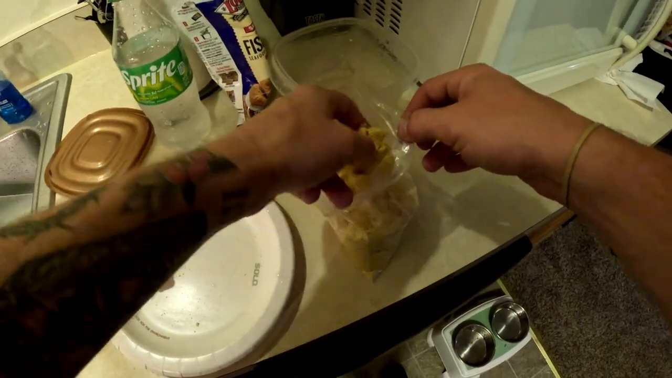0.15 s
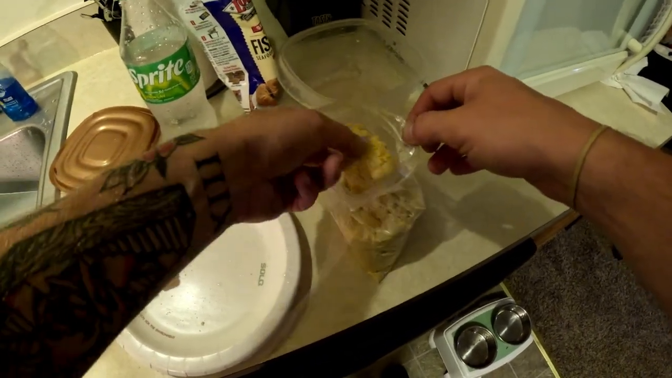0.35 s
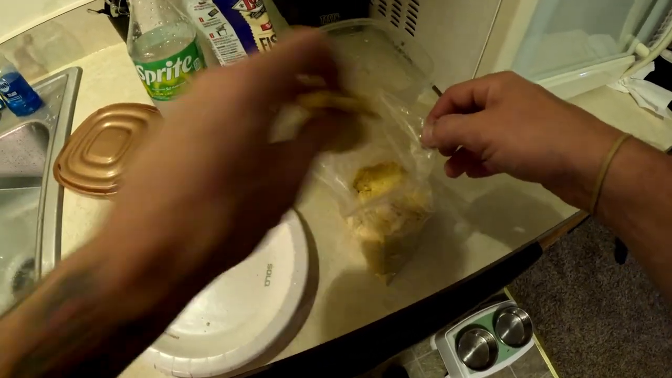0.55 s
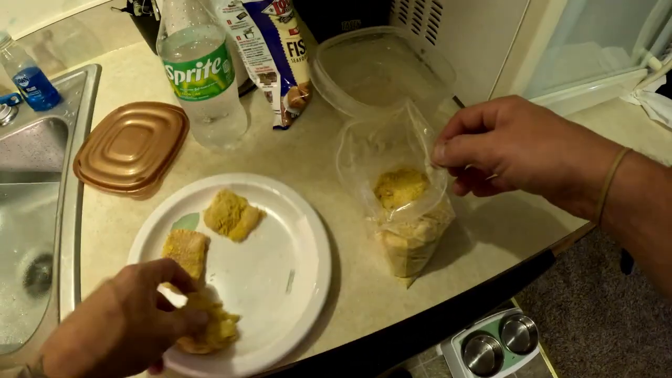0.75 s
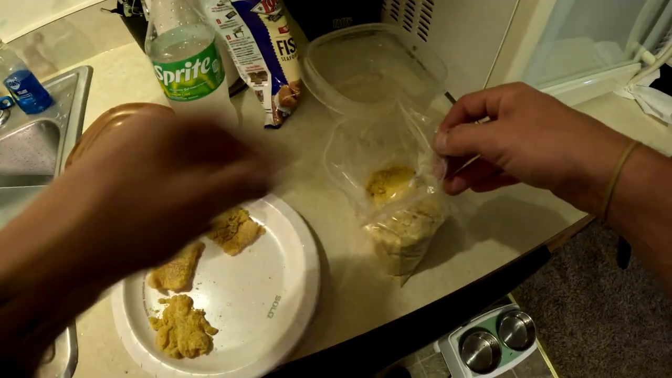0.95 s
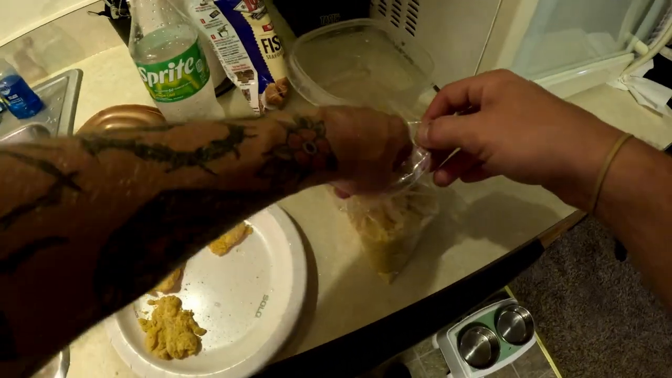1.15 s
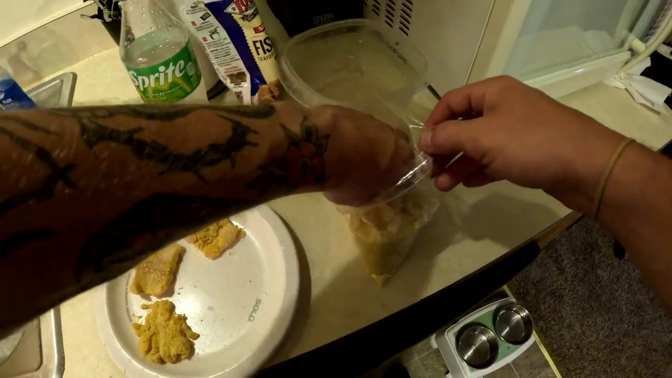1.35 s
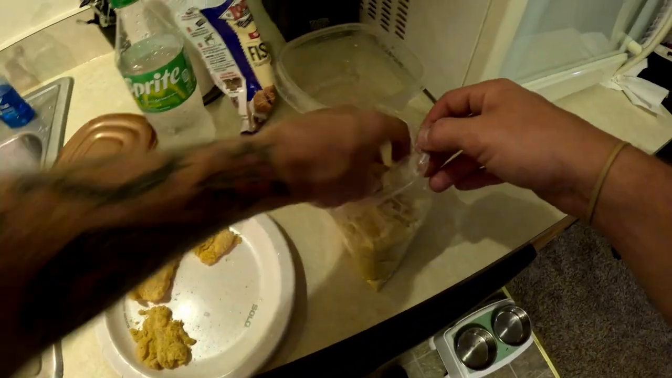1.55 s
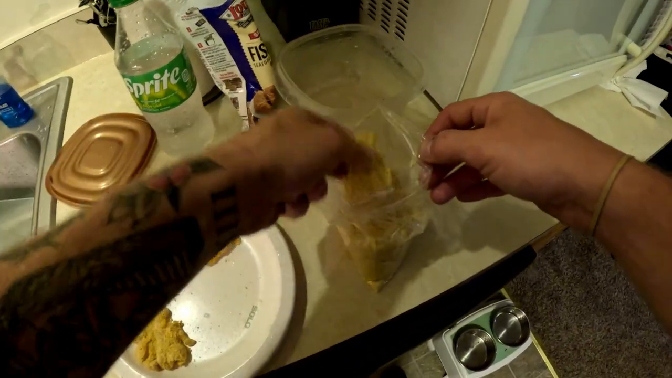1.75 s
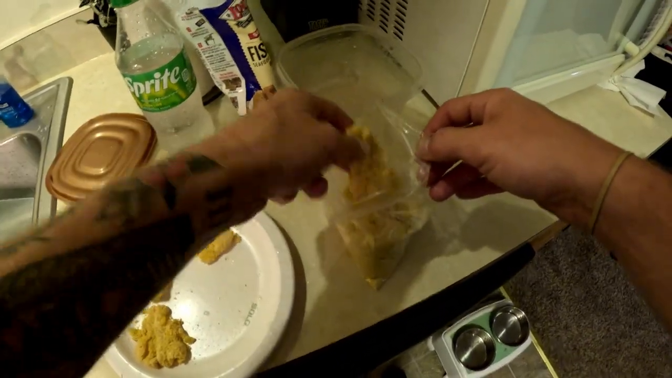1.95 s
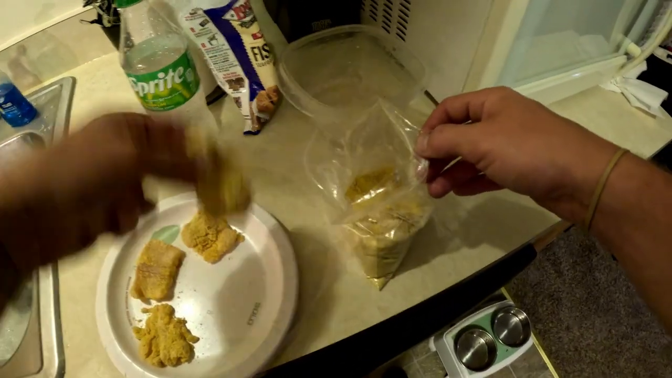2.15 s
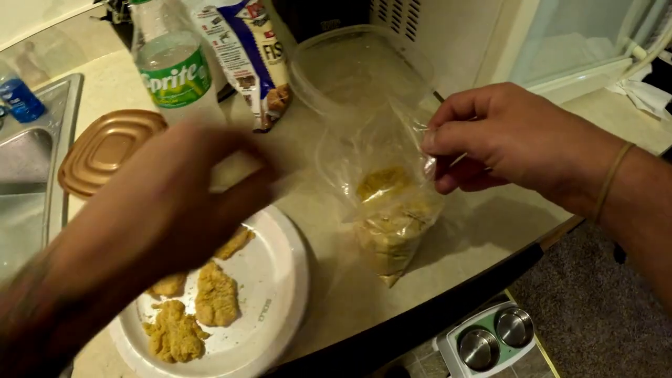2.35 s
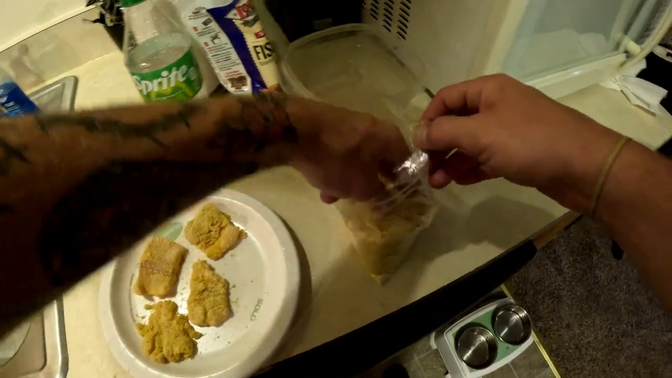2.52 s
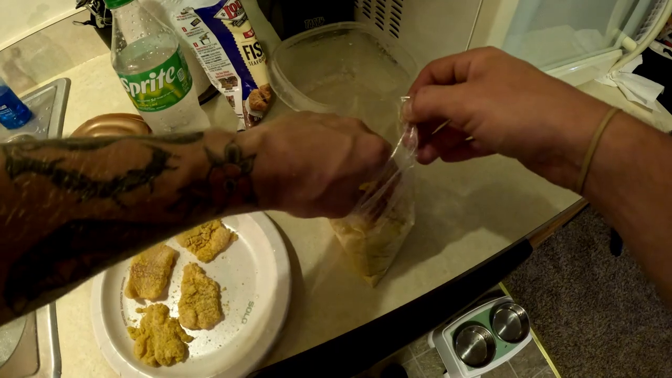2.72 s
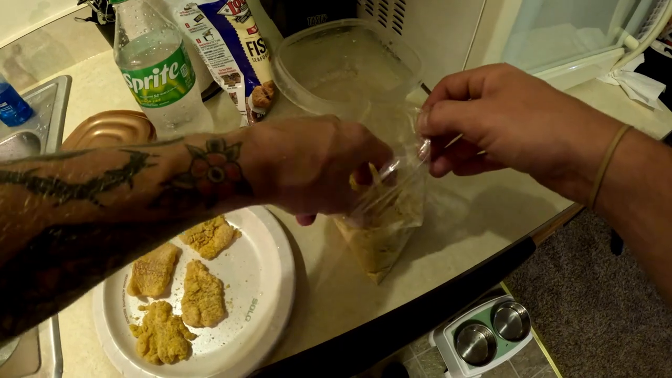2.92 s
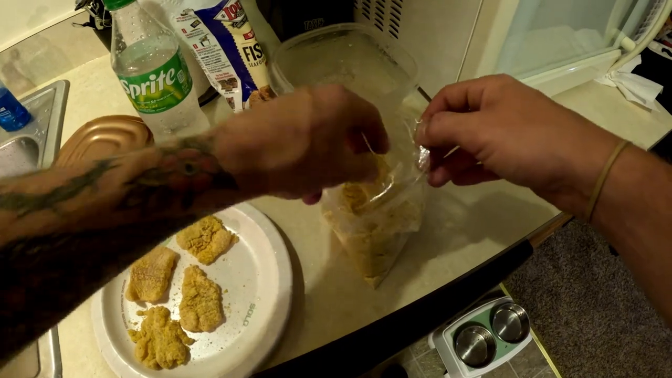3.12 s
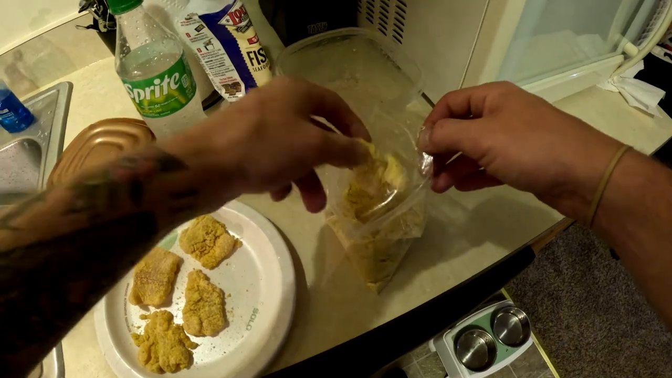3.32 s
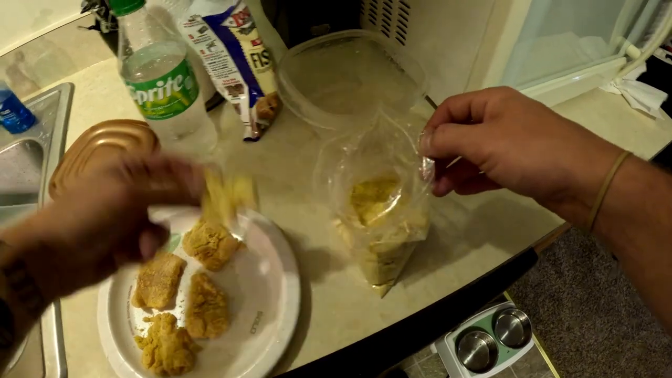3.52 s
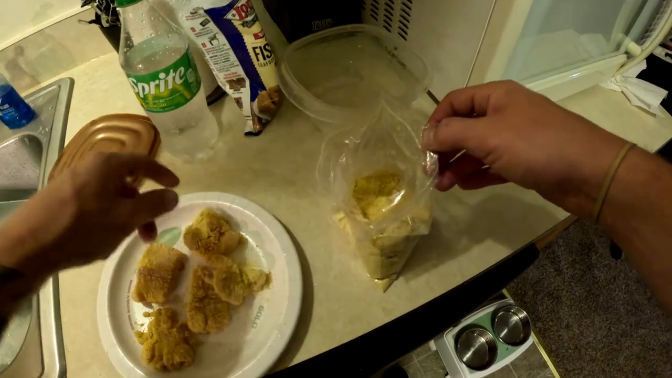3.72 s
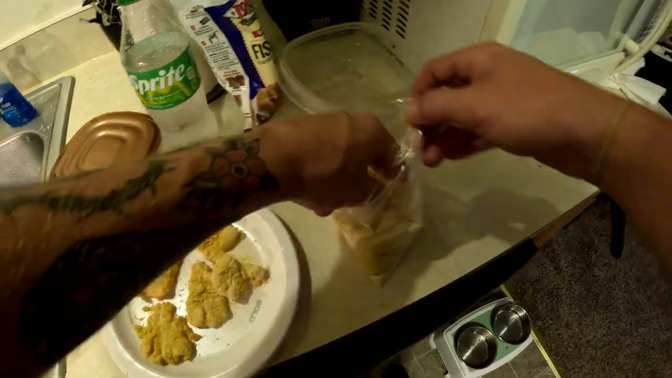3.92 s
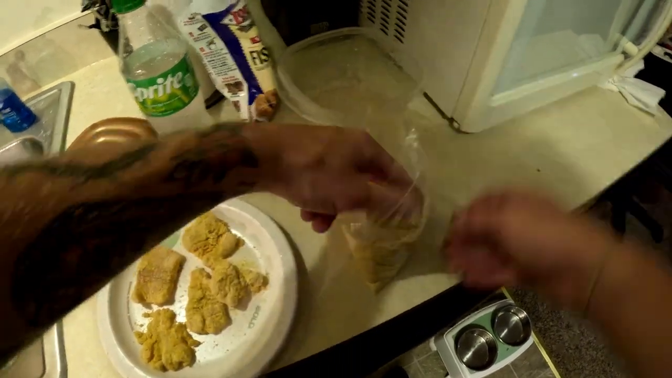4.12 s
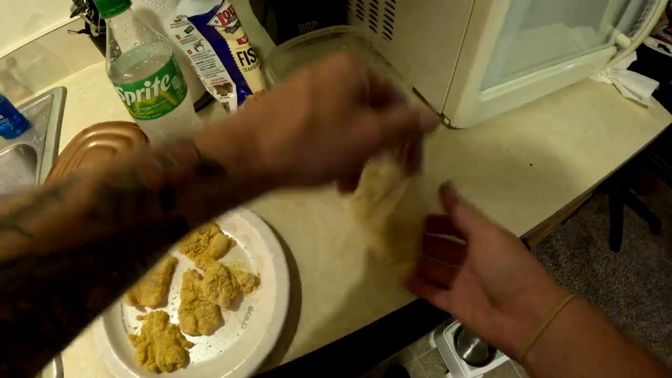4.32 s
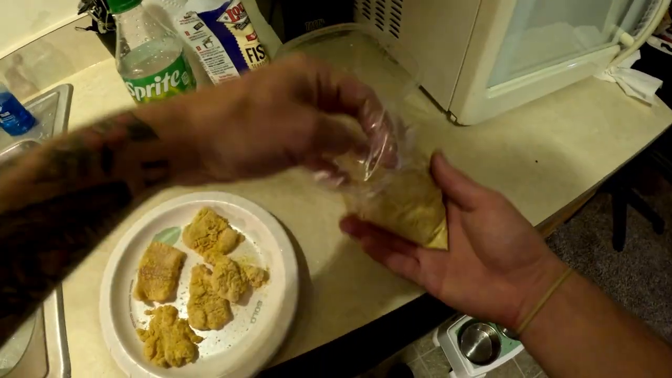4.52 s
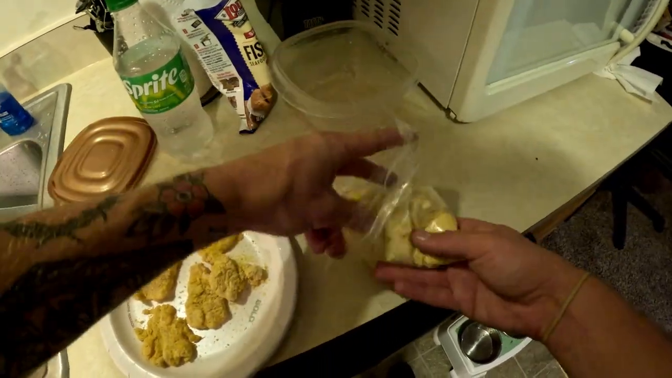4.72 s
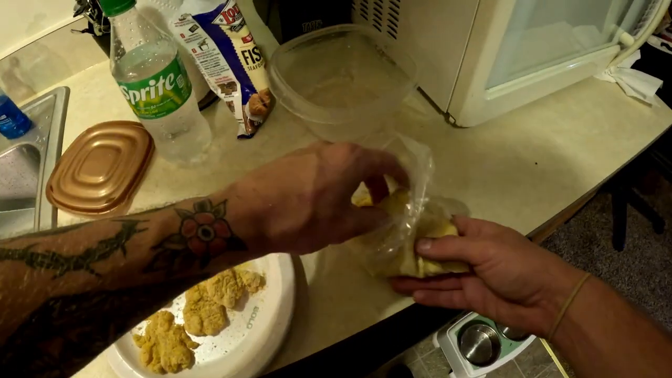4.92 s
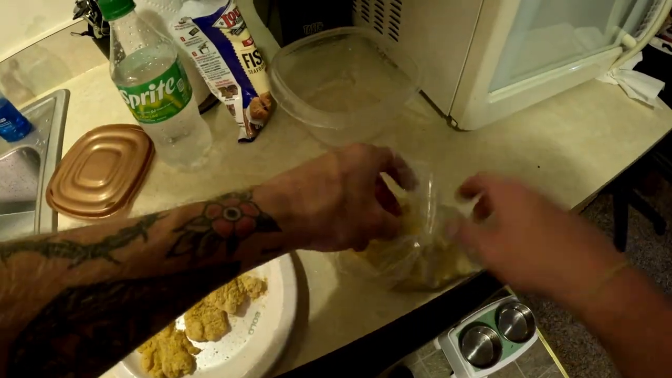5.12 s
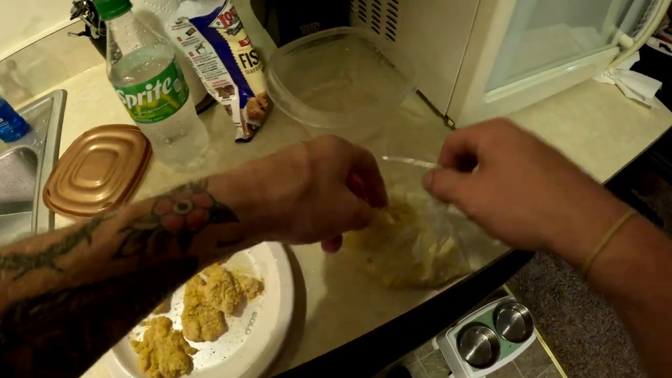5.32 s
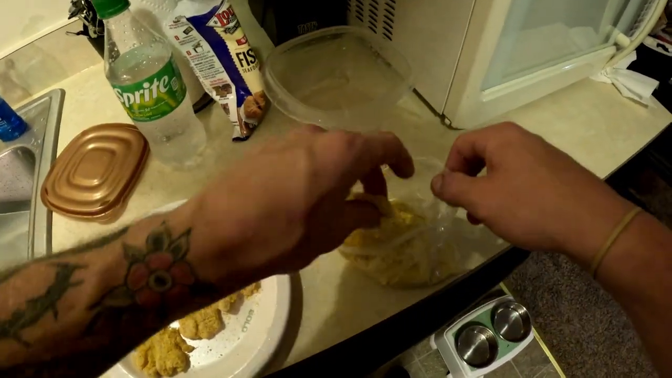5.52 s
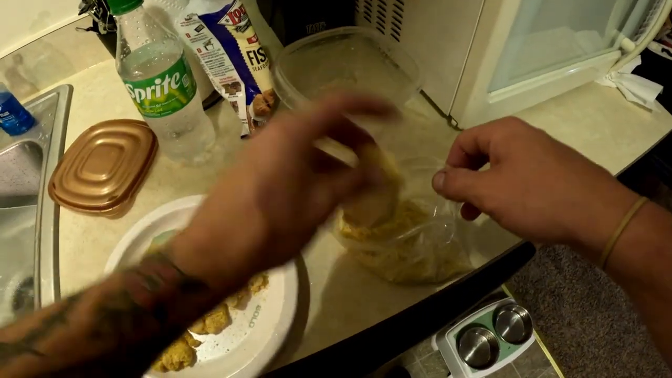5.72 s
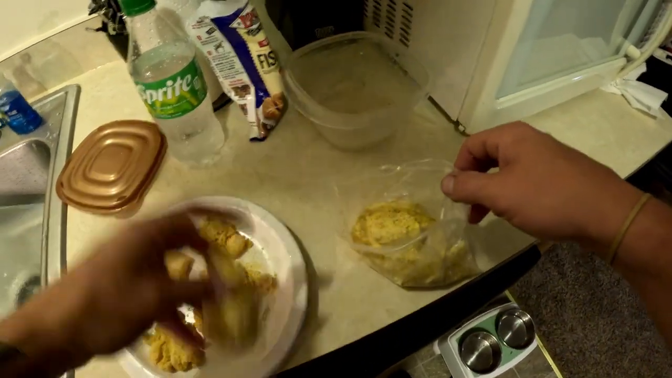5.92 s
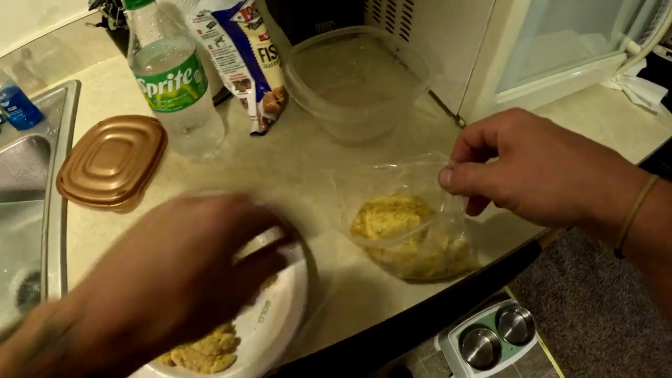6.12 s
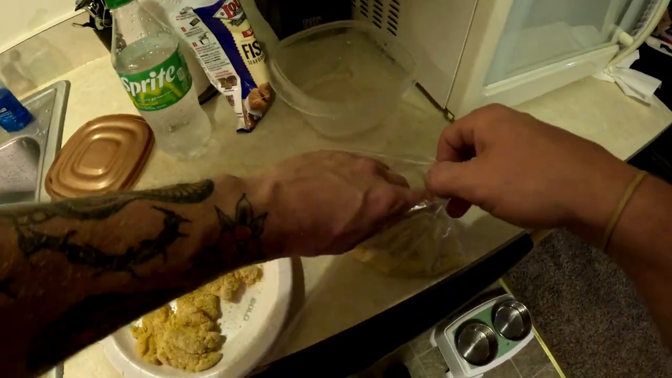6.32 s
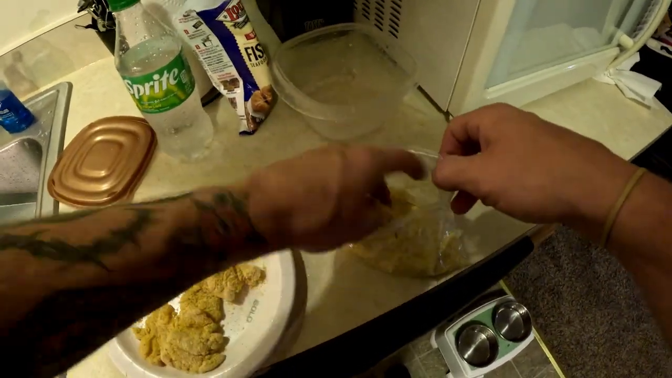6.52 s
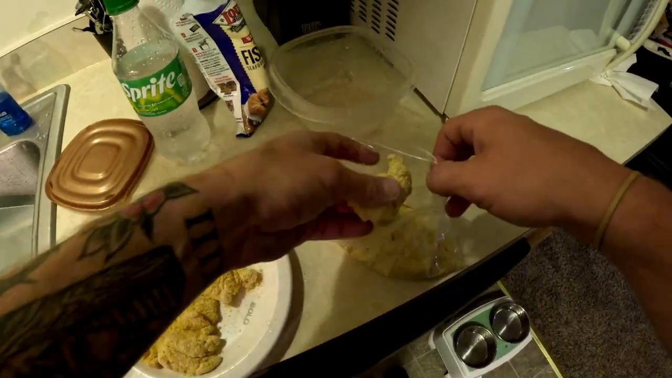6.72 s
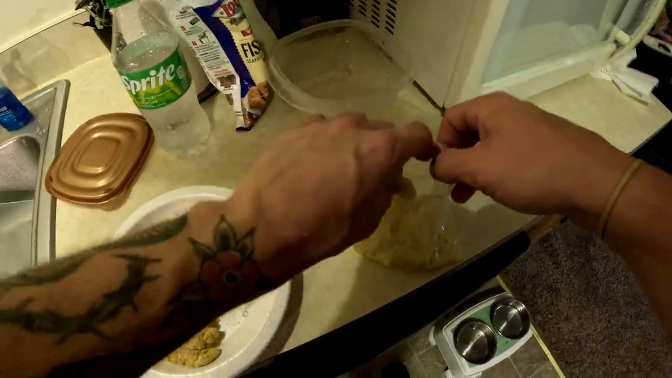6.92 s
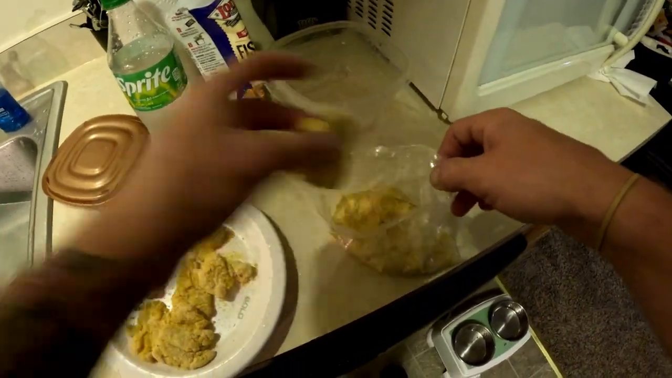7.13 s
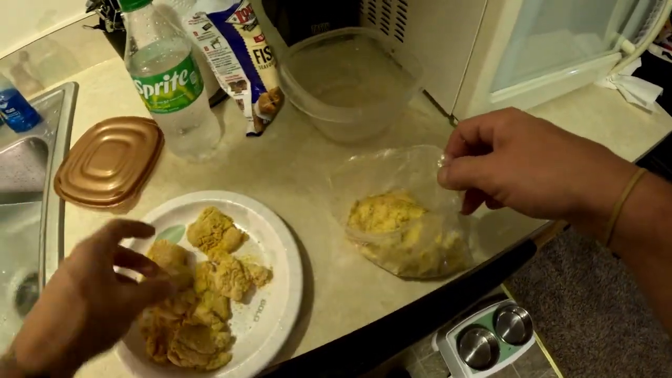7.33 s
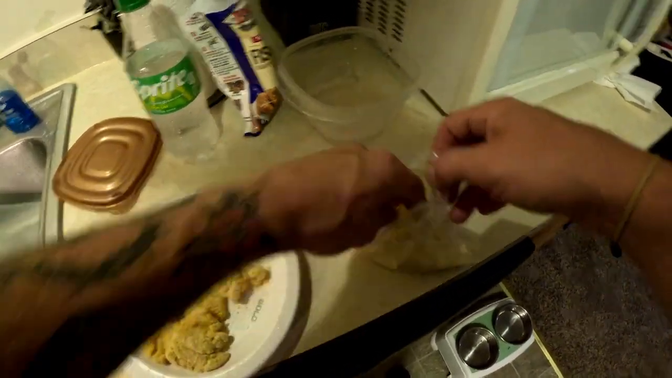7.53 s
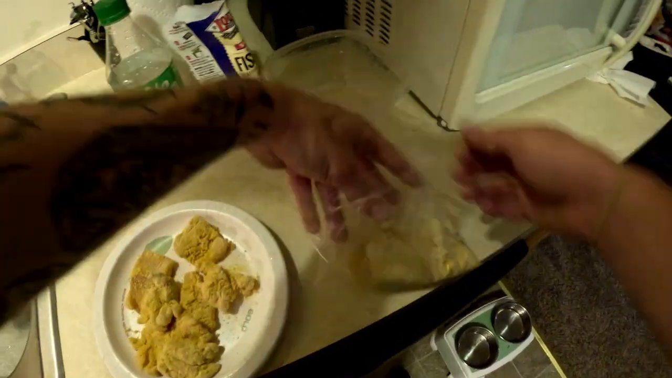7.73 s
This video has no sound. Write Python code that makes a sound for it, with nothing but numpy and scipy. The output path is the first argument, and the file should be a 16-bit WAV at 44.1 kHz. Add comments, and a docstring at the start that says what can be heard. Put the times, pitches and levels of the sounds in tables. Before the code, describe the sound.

Thin plastic film rustles irregularly, made of swarms of tiny dry crackles and louder ticks. It starts muffled and soon opens into crisp treble. The bag falls nearly quiet between reaches, then crackles suddenly again; the densest squeezing comes a little after four seconds. Occasional dull low bumps sound from the counter. Heard near, in a quiet indoor kitchen with slight reflections, low rumble and faint mains hum.

```python
"""At first all is dull and boxy, as a hand digs into a small plastic bag on a kitchen counter; then the treble opens.
The thin film goes on buckling in swarms of tiny creases and in single louder snaps, both made of dying bursts of noise.
From about one second on, food and hands bump softly on counter and plate, which ring as a few low tones.
The bag rests in between and gives way again at once, as pieces of food are lifted onto the plate, until the end.
All along, a low rumble of slow noise, a hum of ringing noise and a faint hiss of the kitchen lie underneath."""
import sys
import numpy as np
from scipy import signal
from scipy.fft import rfft, irfft
from scipy.io import wavfile

SR = 44100
rng = np.random.default_rng(int(sys.argv[2]) if len(sys.argv) > 2 else 0)


def to_wav(s):
    """Save 16-bit WAV."""
    ch = np.atleast_2d(s).T  # columns
    pcm = np.round(np.clip(ch, -1, 1) * 32767)  # PCM
    wavfile.write(sys.argv[1], SR, pcm.astype(np.int16))


N = 342216      # samples in the scene

# Rustles, one for each squeeze or tug of the film: top t/s, swell t/s per 20 dB, fade t/s per 20 dB,
# creases level/dB, then walls level/dB and finest wrinkles level/dB against the creases
RUSTLES = [(.02, 0.18, 0.21, -54.5, -8, -13), (.21, 0.35, 0.26, -47.5, -3, -13),
           (.35, 0.37, 0.13, -52.5, -2, -15), (.41, 0.089, 0.029, -58, -9, -1),
           (.465, .02, 0.12, -60.5, -4, 1), (0.523, 0.021, 0.064, -63, 0.5, 7),
           (.725, 0.09, 0.026, -49.5, -5.5, -2), (.755, 0.017, 0.049, -38, -21, -3),
           (0.834, 0.039, 0.089, -42, -17, -3), (.89, 0.12, 0.054, -51, -39, 1),
           (1.0, .1, 0.079, -70.5, 0, -2), (1.08, 0.19, 0.033, -72, 3, -2),
           (1.124, 0.0089, .1, -47.5, 0, -6), (1.179, 0.07, 0.054, -39, -5.5, -4),
           (1.289, 0.12, 0.11, -44.5, -6, -5), (1.364, 0.011, 0.35, -49.5, -3.5, -4),
           (1.658, 0.24, 0.65, -46.5, -6.5, -1.5), (1.915, .02, 0.65, -67, -23, 4),
           (1.98, 0.07, 0.067, -61, -19, 0), (2.348, 0.034, 0.11, -49.5, -23, 1),
           (2.475, 0.036, 0.04, -68.5, 11, -4), (2.504, .008, 0.31, -46, -3.5, -4),
           (2.66, 0.12, 0.13, -41, -6.5, -1.5), (2.71, 0.065, 0.3, -53, -8, -3.5),
           (2.98, .2, 0.86, -48, -10, -5), (3.12, 0.027, .3, -67, -9, -13),
           (3.21, .1, 0.055, -65, 8.5, -11), (3.33, 0.062, 0.045, -60, 4, 15),
           (3.462, .02, 0.022, -53.5, -5, -3), (3.505, 0.0099, 0.18, -62.5, -1.5, 6),
           (3.67, 0.046, .1, -48, -13.5, 4), (3.875, 0.023, 0.056, -58, 1, -7),
           (3.895, 0.037, 0.021, -53, -1, -8), (3.998, 0.041, 0.18, -42.5, -6, -4),
           (4.15, 0.11, 0.19, -44.5, -6, -2), (4.235, 0.042, 0.027, -50, -1.5, -3),
           (4.343, .015, .05, -43.5, 3, -2), (4.368, 0.023, 0.078, -32, -4.5, -11),
           (4.41, 0.068, 0.022, -44, -3, -1), (4.475, 0.024, 1, -45, -6, -6),
           (4.57, .2, 0.067, -41, -5, -3.5), (4.68, 0.15, 0.085, -39.5, -6.5, -1),
           (4.8, 0.064, 0.13, -40.5, -7.5, -3), (4.93, 0.18, 0.96, -51.5, -12.5, -9),
           (5.21, 0.19, 0.034, -49, -10, 1), (5.321, 0.045, 0.22, -50, -4.5, -8),
           (5.419, 0.13, 0.054, -44.5, -6.5, -4), (5.46, .05, 0.11, -55.5, -9, 1),
           (5.6, 0.16, 0.085, -47, -8.5, 0), (5.7, 0.028, 0.94, -58.5, -9.5, 3),
           (5.864, 0.042, 0.026, -47, 1, -3), (5.95, 0.04, 0.26, -64.5, -17, 8.5),
           (6.049, 0.026, 0.036, -55, -7, -4), (6.15, 0.17, .08, -53.5, -24, -3),
           (6.295, 0.02, .03, -44, -8.5, -5), (6.33, 0.043, 0.067, -43.5, -5, -0.5),
           (6.44, 0.27, 0.83, -54.5, -6, -4), (6.611, 0.057, 0.37, -46.5, -6.5, -3),
           (6.87, 0.2, 0.17, -48, -9, -0.5), (6.98, 0.11, .15, -56.5, -8.5, -4),
           (7.06, 0.066, 0.13, -53, -7.5, -1), (7.152, 0.046, 0.031, -47.5, -10, 1),
           (7.26, 0.055, .05, -69, -9, 11), (7.365, .006, 0.38, -57, -25, 2),
           (7.55, 0.2, 0.29, -55, -7, -11), (7.69, 0.17, 0.045, -39.5, -5, -8),
           (7.738, 0.046, 0.043, -41.5, -3, -7)]
# The bag rests for a moment, then gives way at once: end t/s, length t/s, hush level/dB
RESTS = [(0.52, 0.023, -2.5), (.72, 0.034, -10), (1.12, 0.034, -12), (1.357, 0.022, -5), (1.865, 0.1, -9.5),
         (1.899, 0.04, -12.5), (2.29, 0.22, -16), (2.499, 0.066, -5.5), (3.3, 0.091, -7), (3.438, 0.15, -3),
         (3.498, 0.036, -11), (3.66, 0.028, -6), (3.964, .04, -9), (4.331, 0.03, -11),
         (5.303, 0.057, -11.5), (5.686, 0.03, -1), (5.965, 0.068, -12.5), (6.039, 0.036, -11),
         (6.277, 0.04, -15), (7.373, 0.2, -4)]
# How far walls, folds, creases and wrinkles follow the hush: share [1]
HUSH_SHARES = [.5, .8, 1.0, 1.05]
# Borders between the pitch ranges of walls, folds, creases and wrinkles: f/Hz
FILM_BORDERS = [130, 1750, 4400, 10000, 16200]
# How strongly the film radiates each pitch, as relative values: f/Hz, level/dB per Hz
FILM_RADIATION = [(76, -35), (130, -6.5), (191, -12.5), (316, -3), (628, -4), (1040, -2), (1410, -5),
                  (1720, -6), (2070, 3.5), (3160, 3.5), (4450, 0), (8660, 4), (14900, 3.5), (16200, 5)]
# Single creases snapping over: t/s, peak level/dB of the bright part, ring f/Hz,
# wall level/dB against the bright part, time to fall by 60 dB t/ms
SNAPS = [(.057, -30.5, 5640, -19, 18), (.2113, -19.5, 4130, -11, 1.6), (.259, -30, 3460, -4.5, 6),
         (.283, -30, 7900, -9, 9.2), (.3067, -19.5, 4540, -24, 6.9), (.3716, -32, 4530, -1.5, 11),
         (.3953, -29, 8120, -30, 7), (.4159, -27.5, 7800, -18, 3.4), (.4602, -39, 2800, -8, 14),
         (.5214, -31.5, 6400, -11, 12), (.6321, -37, 7400, -9, 19), (.681, -45, 7120, -4, 7),
         (.6999, -35, 9600, -23, 4), (.7176, -28.5, 9500, -31, 9.2), (.7252, -21, 7250, -25, 4.4),
         (.7536, -16.5, 6000, -31, 7.8), (.7605, -19, 6640, -28, 12), (.8308, -18.5, 12800, -21, 12),
         (.9083, -40, 6430, -28, 22), (.93, -37, 3400, -14, 6.6), (1.062, -44, 2100, -12, 6),
         (1.0757, -41, 9900, -9, 7), (1.1, -42, 2790, -15, 5.3), (1.1194, -25, 3200, -10, 14),
         (1.1568, -26, 6600, -1, 12), (1.1844, -25, 14600, -12, 9), (1.2073, -28.5, 8200, -28, 5.4),
         (1.281, -28.5, 3300, -17, 6), (1.2937, -22.5, 13500, -23, 8), (1.362, -37, 2330, 3, 6.5),
         (1.3672, -22, 5860, -11, 6), (1.4042, -36, 3260, -9, 7.1), (1.474, -26, 8900, -31, 17),
         (1.6235, -28.5, 7500, -27, 7.9), (1.6517, -25, 7100, -9, 10), (1.6936, -25, 6600, -8.5, 21),
         (1.7547, -28, 6300, -23, 2.8), (1.8749, -28.5, 9200, -36, 3), (1.909, -26, 10300, -15, 21),
         (2.194, -49, 8500, -33, 6), (2.2921, -34, 11230, -31, 4.6), (2.3191, -32, 11100, -31, 5),
         (2.4248, -38.5, 5300, -30, 6), (2.468, -44, 9600, -16, 9), (2.5052, -21, 7040, -16, 19),
         (2.5142, -20, 10400, -13, 9.1), (2.582, -26, 9900, -7, 5), (2.625, -27, 7400, -8, 8.5),
         (2.6406, -29, 7400, -27, 4.3), (2.6651, -18, 10200, -8, 6), (2.6969, -22, 9500, -23, 3.3),
         (2.705, -22, 12100, -10, 20), (2.7428, -30, 7200, -17, 11.7), (2.775, -27, 7200, -11.5, 19),
         (2.8055, -32, 9700, -32, 4.6), (2.8345, -33.5, 6500, -29, 4), (2.9121, -32, 7250, -10, 8.8),
         (2.936, -32, 6540, -19, 7.9), (2.9637, -28, 14800, -25, 13), (2.98, -21.5, 11300, -12, 6.7),
         (2.9909, -20, 14800, -13, 5.9), (3.01, -28, 8500, -26, 9.7), (3.0393, -27.5, 8200, -9, 9.2),
         (3.0534, -31, 9350, -12, 6), (3.1195, -24, 8600, -32, 5), (3.1282, -32, 7440, -10, 5),
         (3.4587, -42, 8800, -5, 15), (3.5015, -28.5, 8000, -13, 2.6), (3.561, -38, 8500, -20, 7.5),
         (3.622, -32.5, 9000, -10.5, 8.6), (3.6615, -27.5, 12000, -15, 52), (3.8602, -35.5, 6150, -5.5, 20),
         (3.8701, -26.5, 7250, -18, 2), (3.8862, -26, 7400, -8.5, 13.4), (3.8964, -30.5, 10650, -12, 5.5),
         (3.9907, -22.5, 8300, -19, 8), (3.9974, -24, 8600, -7, 6), (4.0173, -26, 6600, -23, 4),
         (4.0468, -22, 9400, -14, 3), (4.0558, -29, 2620, -24, 6.5), (4.0704, -27, 8500, -16, 6),
         (4.135, -27, 8150, -8, 24), (4.1667, -30, 13100, -9, 4), (4.232, -22, 8400, -11, 4.5),
         (4.3255, -36, 7380, -12, 7.3), (4.339, -28, 2370, 0, 22), (4.3423, -27, 11400, -18, 14),
         (4.3666, -16.5, 10100, -10, 20), (4.3706, -18.5, 2220, -7, 18), (4.3866, -20, 11900, -6, 11),
         (4.394, -22, 2250, -17, 11), (4.4036, -24, 3540, -23, 13), (4.4697, -22.5, 7400, -10, 5.6),
         (4.4791, -21.5, 6240, -9, 4.6), (4.503, -28, 8900, -11, 3), (4.5281, -19.5, 7800, -30, 2.3),
         (4.5454, -20, 6200, -6.5, 11), (4.5566, -21, 6550, -16, 8.3), (4.568, -26, 11700, -22, 22),
         (4.598, -27, 6740, -14, 27), (4.637, -18, 8950, -33, 3.5), (4.735, -25, 9700, -22, 4),
         (4.7755, -25, 8900, -21, 3), (4.783, -26, 11100, -17, 15), (4.7978, -21, 11400, -28, 2.7),
         (4.8035, -20, 3450, -11, 3.7), (4.8287, -27, 11400, -9, 3.9), (4.8334, -16.5, 9500, -32, 1.9),
         (4.86, -26, 4050, -35, 2.9), (4.8879, -24.5, 9000, -17, 2.4), (4.9064, -24.5, 4940, -33, 7.5),
         (4.9206, -25, 4560, -25, 4.3), (4.9687, -25, 3600, -28, 6), (4.9922, -32, 12500, -33, 7),
         (5.0312, -28, 3840, -40, 6.4), (5.0855, -22.5, 11000, -20, 2.6), (5.1347, -25, 10200, -31, 2.4),
         (5.1527, -30, 8400, -14, 6.5), (5.207, -26.5, 4100, -30, 1.8), (5.233, -33.5, 11700, -26, 6.6),
         (5.3117, -30, 3260, -10.5, 13), (5.3471, -27.5, 8500, -8, 1.1), (5.4147, -18.5, 9900, -12.5, 12),
         (5.5189, -28, 14500, -12, 4), (5.6886, -20, 8900, -21, 1.7), (5.9237, -34.5, 9900, -34, 3.1),
         (6.0295, -44, 9900, -19, 3), (6.0496, -39.5, 2180, -20, 4.7), (6.1765, -33, 11100, -42, 10),
         (6.2303, -43, 14000, -33, 7), (6.288, -28, 8600, -25, 5.5), (6.3055, -19, 8100, -30, 1.1),
         (6.3154, -20.5, 9050, -22, 4), (6.439, -33, 9300, -9, 5.2), (6.4514, -28, 3340, -19, 1.7),
         (6.4629, -29.5, 13100, -30, 2.4), (6.6004, -28, 5300, -19, 2.5), (6.7653, -30, 7000, -29, 3.3),
         (6.7822, -34.5, 6920, -6, 3.6), (6.917, -31, 9000, -34, 9.9), (7.0558, -39, 11900, -13, 12),
         (7.258, -44, 10000, -23, 8.2), (7.3129, -39.5, 8340, -14, 7.6), (7.352, -45, 10600, -27, 8.1),
         (7.3629, -35, 12600, -32, 5), (7.374, -44, 13400, -32, 4.4), (7.3884, -43, 11300, -39, 4),
         (7.4037, -29, 10000, -36, 2.7), (7.4576, -32, 10400, -24, 3.6), (7.5187, -37, 3600, -30, 9.6),
         (7.544, -27, 3600, -24, 4.7), (7.5531, -28, 12000, -22, 3), (7.6088, -22, 13700, -27, 4.3),
         (7.6195, -30.5, 5600, -10, 27), (7.6544, -25, 3560, -23, 4), (7.6867, -19.5, 3100, -34, 13),
         (7.6968, -26, 3200, -30, 6.3)]
# How far the left microphone port trails the right one: f/Hz, phase [radians]
PORT_LAG = [(100, 0.067), (1500, 0.13), (2200, 0.15), (4500, 1), (8300, 0.69), (11300, 0.85), (16000, 0.12)]
# How much side signal sets the two ports apart: f/Hz, side level/dB
BAG_WIDTH = [(200, -20.5), (1500, -10), (4500, -17.5), (8000, -32.5), (15000, -10.5)]
# Soft bumps on counter and plate: t/s, push level/dB, hardness level/dB per octave
BUMPS = [(1.149, -41, 0), (2.518, -51, 5), (2.65, -49, -4), (4, -44, -1), (4.374, -54, -18),
         (4.541, -39, 0), (5.872, -40, -2.5), (6.099, -40.5, 0), (6.125, -45, -4), (6.154, -39, -5),
         (6.281, -46, -9), (7.431, -52, 4), (7.688, -45, -1)]
# Ringing tones of the counter top: f/Hz, level/dB against the push, time to fall by 60 dB t/s
COUNTER_TONES = [(64.7, -2, .16), (120, -3.5, 0.07), (187, -16, 0.15), (275, -8, 0.1), (377, -15, 0.073)]
# Course of the low rumble: t/s, flutter level/dB before its left-right balance, throb level/dB
RUMBLE_COURSE = [(0, -56, -73), (.43, -49.5, -55), (1.69, -58, -56.5), (2.01, -36.5, -53.5),
                 (2.29, -59.5, -57), (2.57, -49, -56), (3.13, -56, -56.5), (3.41, -46, -54),
                 (3.52, -70, -54), (3.82, -49, -56), (4.02, -56, -48), (4.11, -67, -65),
                 (4.21, -50.5, -51.5), (5.1, -59, -55.5), (5.3, -48, -50.5), (5.49, -55, -55),
                 (5.77, -46, -53), (5.94, -58, -55), (6.11, -49.5, -46), (6.38, -53, -54.5),
                 (6.85, -55, -55.5), (7.07, -36, -51), (7.54, -61, -57.5), (7.76, -39.5, -47)]
# Colour of the low throb, as relative values: f/Hz, level/dB per Hz
THROB_COLOUR = [(18, 5), (24, -4), (40, 0), (48, -5), (62, -2.5), (80, -12), (105, -18.5), (135, -30),
                (160, -33)]
# Tones of the mains hum: f/Hz, level/dB
HUM_TONES = [(60, -68), (120, -78), (240, -82.5)]
# Colour of the kitchen's hiss, as relative values: f/Hz, level/dB per Hz
ROOM_COLOUR = [(130, -14), (220, 1), (290, 12.5), (450, 7.5), (650, 11), (900, -7), (1600, -12), (2100, -1),
               (3300, -9), (4000, -41), (8600, -76), (16000, -85)]

FOLDS_LEAN, FOLDS_DB = 0.49, -0.02      # folds lie between creases (0) and walls (1), plus this offset
SETTLE_S = 0.011
CREASES_PER_S, CREASE_T60_S = 1800, 0.0083      # usual rate of creases; time for one to fall by 60 dB
SIZE_SPREAD_DB, SWARM_DB, SLIDE_DB = 5, 4, 1    # crease sizes, strength of swarming, hiss of sliding film
SMALL_SNAP_COUNT, SMALL_T60_MS = 90, 4.6        # the fall time is an average
SMALL_SNAP_DB, SMALL_SPREAD_DB = 11, 1.5        # base peak over the creases around, and spread of sizes
SMALL_WALL_DB = -23.5
SNAP_WIDTH, SNAP_BROAD_DB, SNAP_RISE_S = 0.24, 0, 0.0002    # width as a share of the ring's pitch
KITCHEN_DB, KITCHEN_T60_S, WALL_CUT_HZ = -18, .1, 9000
ROOM_TONE_DB = -74
DULL_UNTIL_S, DULL_HZ, BOXY_DB = .38, 8500, 6.5
CUTOFF_HZ = 16300


def handling():
    """Levels/dB of walls, folds, creases and wrinkles: each rustle swells to its top and fades; powers add."""
    t = np.arange(0, N, 32) / SR
    power = 1e-11       # floor
    for top_s, swell_s, fade_s, creases_db, walls_db, wrinkles_db in RUSTLES:
        rising = (top_s - t) / max(swell_s, .003)
        falling = (t - top_s) / max(fade_s, .003)
        shape_db = -20 * np.where(t < top_s, rising, falling)
        folds_db = walls_db * FOLDS_LEAN + FOLDS_DB
        shares_db = np.array([[walls_db], [folds_db], [0], [wrinkles_db]])
        power = power + from_db(creases_db + shares_db + shape_db) ** 2
    return np.array([np.interp(np.arange(N) / SR, t, 10 * np.log10(p)) for p in power])


def resting():
    """Hush in dB: the film settles quickly, rests, and starts again without warning."""
    t = np.arange(N) / SR
    hush = 0
    for end_s, length_s, hush_db in RESTS:
        settled = np.clip((t - end_s + length_s) / SETTLE_S, 0, 1)
        hush = hush + hush_db * settled * (t < end_s)
    return hush


def crinkle(levels_db):
    """Creases buckle in swarms of dying spits of noise in narrow colours, over the hiss of sliding film."""
    swarm = from_db(SWARM_DB * (.7 * drift(30) + 0.64 * drift(120)))
    born = rng.random(N) < CREASES_PER_S * swarm / SR
    sizes = born * from_db(SIZE_SPREAD_DB * np.minimum(rng.exponential(1, N), 4))

    # Deal the creases into seven groups, each with its own train of dying spits
    group = rng.integers(0, 7, N)
    fall = from_db(-60 / (CREASE_T60_S * SR))
    spits = [rms_one(signal.lfilter([1], [1, -fall], sizes * (group == k) + 1e-18)) for k in range(7)]
    slide = from_db(SLIDE_DB) * np.sqrt(swarm)

    white = rng.standard_normal((2, 2, N))
    out = np.zeros((2, N))
    k = 0
    for level_db, low, high in zip(levels_db, FILM_BORDERS, FILM_BORDERS[1:]):
        edges = np.geomspace(low, high, 1 + round(3.5 * np.log2(high / low)))
        part = 0
        for a, b in zip(edges, edges[1:]):
            k += 1      # most creases shake patches two octaves apart, some the whole bag
            shaken = (spits[k % 7] + .6 * spits[0] + slide) * white[k % 2]
            part = part + from_db(at_hz(FILM_RADIATION, np.sqrt(a * b))) * band(shaken, a, b)
        out += from_db(level_db) * rms_one(part)
    return out


def snaps(rows):
    """Each snap is a noise burst that swells quickly and dies fast, coloured by the patch that flips."""
    length = 1024       # samples
    t = np.arange(length) / SR
    out = np.zeros((2, N + length))
    for white, (s, peak_db, hz, wall_db, t60_ms) in zip(rng.standard_normal((len(rows), 2, length)), rows):
        burst = white * from_db(-60 * t * 1000 / t60_ms) * np.minimum(t / SNAP_RISE_S, 1)
        patch = rms_one(band(burst, hz / (1 + SNAP_WIDTH), min(hz * (1 + SNAP_WIDTH), 17000)))
        bright = patch + from_db(SNAP_BROAD_DB) * rms_one(band(burst, 2920, 15550))
        wall = band(burst, 470, 2800)
        # Row 0 is the sound common to both ports; its peak sets the level
        snap = bright / abs(bright[0]).max() + from_db(wall_db) * wall / abs(wall[0]).max()
        start = round(s * SR)
        out[:, start:start + length] += from_db(peak_db) * snap
    return out[:, :N]


def small_snaps(creases_db):
    """Lesser snaps fall at random, their loudness following the rustle around them, on patches of many sizes."""
    when, size, patch, life = rng.random((SMALL_SNAP_COUNT, 4)).T
    around_db = creases_db[(when * N).astype(int)]
    peak_db = around_db + SMALL_SNAP_DB - SMALL_SPREAD_DB * np.log(size + 0.035)
    hz = 2500 * 4.0 ** np.sqrt(patch)
    wall_db = np.full(SMALL_SNAP_COUNT, SMALL_WALL_DB)
    return list(zip(when * N / SR, peak_db, hz, wall_db, SMALL_T60_MS * (.5 + life)))


def ports(common, spread):
    """The bag reaches both microphone ports: the left trails in phase, and width sets them partly apart."""
    hz = np.maximum(np.fft.rfftfreq(N, 1 / SR), 1)
    lag = at_hz(PORT_LAG, hz)
    side = irfft(rfft(spread) * from_db(at_hz(BAG_WIDTH, hz)), N)
    trailing = irfft(rfft(common) * np.exp(-1j * lag), N)
    return np.array([trailing + side, common - side])


def kitchen(x):
    """Reflections: a dying noise of its own for each channel, duller than the direct sound."""
    t = np.arange(SR // 4) / SR
    fading = from_db(-60 * t / KITCHEN_T60_S) * (t > .0015)
    tail = rng.standard_normal((2, len(t))) * fading
    tail = signal.lfilter(*signal.butter(1, WALL_CUT_HZ, fs=SR), tail)
    tail = tail / np.sqrt((tail ** 2).sum(axis=1, keepdims=True))      # energy 1
    return signal.fftconvolve(x[None], tail, axes=1)[:, :N]


def bumps():
    """A soft push rings the counter top; a harder one wakes the upper tones more."""
    at = [round(s * SR) for s, db, hard in BUMPS]
    push_db, hard_db = np.array(BUMPS)[:, 1:].T
    lowest_hz = COUNTER_TONES[0][0]
    out = np.zeros(N)
    for hz, level_db, t60 in COUNTER_TONES:
        pushes = np.zeros(N)
        pushes[at] = from_db(push_db + level_db + hard_db * np.log2(hz / lowest_hz))
        out += ring(pushes, hz, t60)
    return low_pass(out, 350)


def rumble():
    """Noise as a flutter at the edge of hearing, stronger on the right, and a low throb in the middle."""
    flutter_db, throb_db = in_time(RUMBLE_COURSE)
    flutter = steady_noise([(8, -6.5), (15, 4.0), (21, 0.0), (28, -37), (60, -70)], likeness=0.86)
    flutter = flutter * from_db([[-4.5], [3.5]])        # left, right
    throb = steady_noise(THROB_COLOUR + [(400, -110)], likeness=0.91)
    return from_db(flutter_db) * flutter + from_db(throb_db) * throb


def hum():
    """A wavering mains hum: noise ringing in narrow resonances."""
    white = rng.standard_normal((len(HUM_TONES), N))
    return sum(from_db(db) * rms_one(ring(w, hz, 0.57)) for w, (hz, db) in zip(white, HUM_TONES))


def room_tone():
    """The faint hiss of the kitchen: steady coloured noise, only partly alike on left and right."""
    return from_db(ROOM_TONE_DB) * steady_noise(ROOM_COLOUR, likeness=0.39)


def from_db(db):
    """Turn decibels into a plain factor."""
    return 10 ** (np.asarray(db) / 20)


def rms_one(x):
    """Scale a signal to an average strength (rms) of 1."""
    return x / np.sqrt(np.mean(x ** 2) + 1e-20)


def in_time(rows):
    """Draw straight lines between the rows of a table, whose first column is time."""
    s, *columns = np.transpose(rows)
    return [np.interp(np.arange(N) / SR, s, c) for c in columns]


def at_hz(points, hz):
    """Read a table at any pitch, with straight lines over the logarithm of frequency."""
    table_hz, values = np.array(points).T
    return np.interp(np.log(hz), np.log(table_hz), values)


def drift(rate_hz):
    """Slow chance: noise through a double one-pole low-pass, run in; spread 1."""
    r = np.exp(-20 * np.pi * rate_hz / SR)      # computed at a tenth of the sample rate
    slow = signal.lfilter([1], [1, -2 * r, r * r], rng.standard_normal(N // 10 + 4002))[4000:]
    return np.interp(np.arange(N) / 10, np.arange(len(slow)), rms_one(slow))


def ring(x, hz, t60):
    """A unit click sets a dying sine ringing, with a starting height of about 1."""
    r = from_db(-60 / (t60 * SR))
    w = 2 * np.pi * min(hz, .45 * SR) / SR
    return signal.lfilter([0, np.sin(w)], [1, -2 * r * np.cos(w), r * r], x + 1e-18)


def band(x, low_hz, high_hz):
    """Keep only the pitches between two limits."""
    return signal.sosfilt(signal.butter(2, [low_hz, high_hz], "band", fs=SR, output="sos"), x)


def low_pass(x, hz):
    """Soften the pitches above a limit."""
    return signal.sosfilt(signal.butter(2, hz, fs=SR, output="sos"), x)


def steady_noise(spectrum, likeness):
    """Stereo noise of a given spectrum and left-right likeness; rms 1."""
    hz = np.maximum(np.fft.rfftfreq(N, 1 / SR), 1)
    colour = from_db(at_hz([(1, -120)] + spectrum, hz))
    mid, side = irfft(rfft(rng.standard_normal((2, N))) * colour, N)
    left_right = np.array([[1], [-1]])
    return rms_one(np.sqrt(1 + likeness) * mid + np.sqrt(1 - likeness) * side * left_right)


def scene():
    """The handled bag and its reflections, over bumps, rumble, hum and hiss."""
    levels_db = handling() + np.outer(HUSH_SHARES, resting())
    all_snaps = small_snaps(levels_db[2]) + list(SNAPS)
    common, spread = crinkle(levels_db) + snaps(all_snaps)
    bag = ports(common, spread) + from_db(KITCHEN_DB) * kitchen(common)
    return bag + bumps() + rumble() + hum() + room_tone()


def record(dry):
    """The first moment is dull and boxy, then the treble opens up; the top is cut steeply."""
    dull = low_pass(dry, DULL_HZ) + from_db(BOXY_DB) * band(dry, 130, 236)
    opened = np.clip((np.arange(N) / SR - DULL_UNTIL_S) / 0.006, 0, 1)
    heard = opened * dry + (1 - opened) * dull
    return signal.sosfilt(signal.cheby2(16, 60, CUTOFF_HZ, fs=SR, output="sos"), heard)


dry = scene()
out = record(dry)
to_wav(out)
```